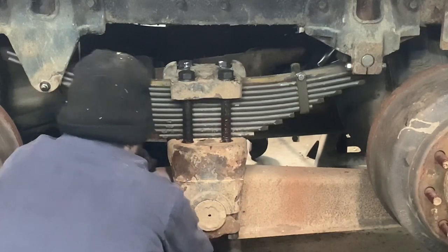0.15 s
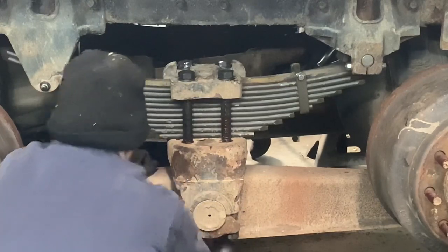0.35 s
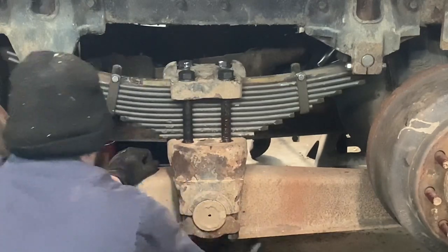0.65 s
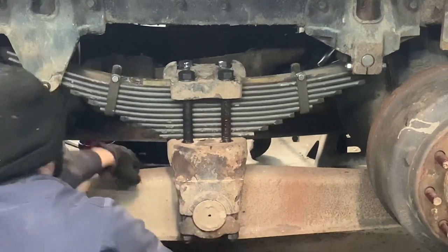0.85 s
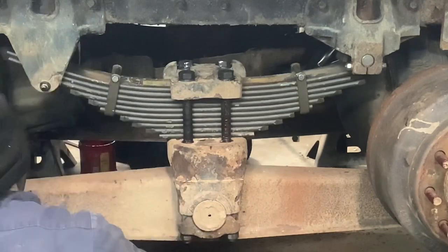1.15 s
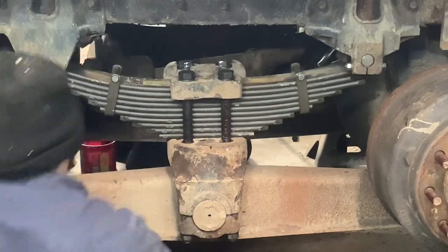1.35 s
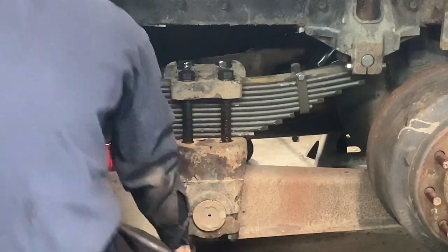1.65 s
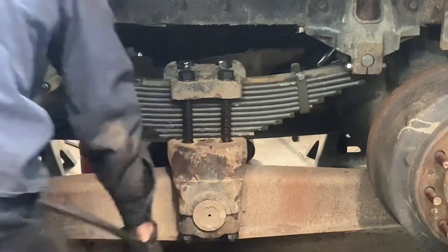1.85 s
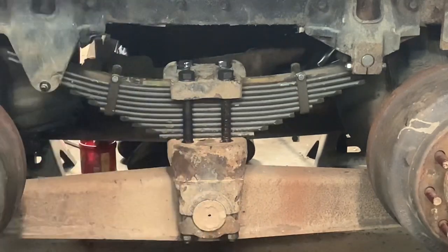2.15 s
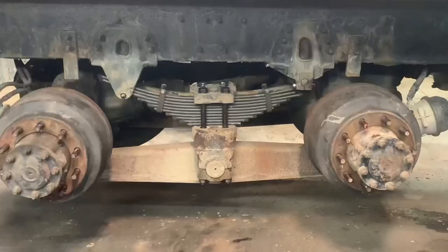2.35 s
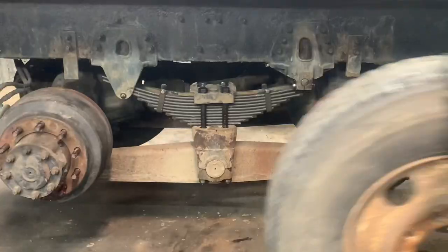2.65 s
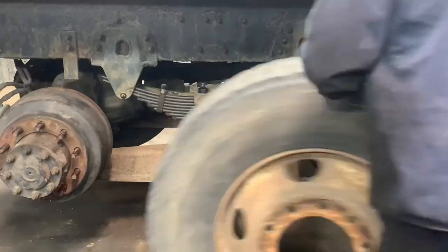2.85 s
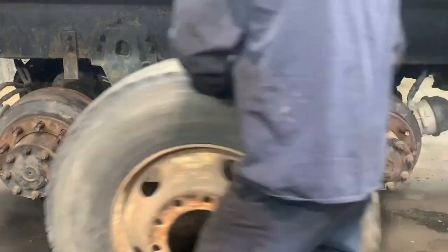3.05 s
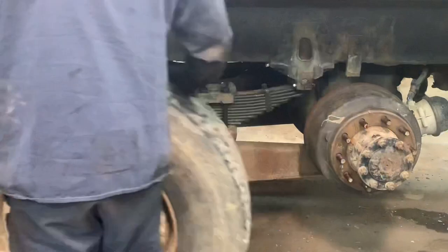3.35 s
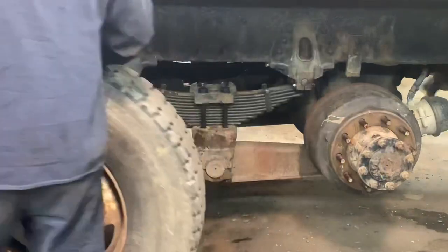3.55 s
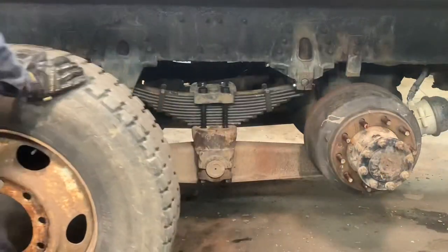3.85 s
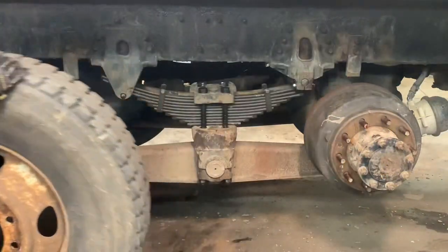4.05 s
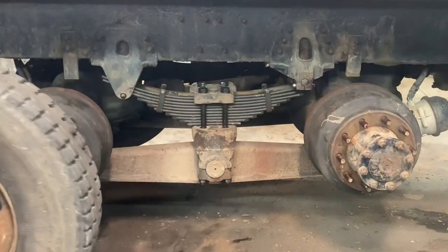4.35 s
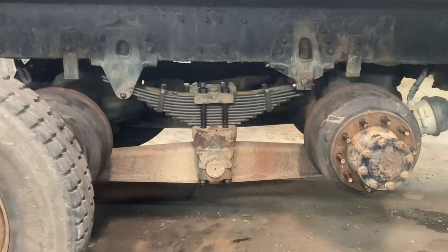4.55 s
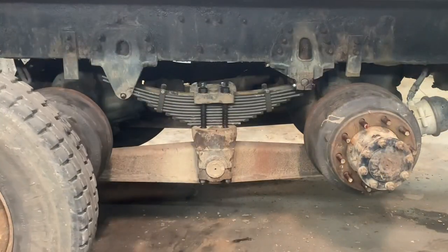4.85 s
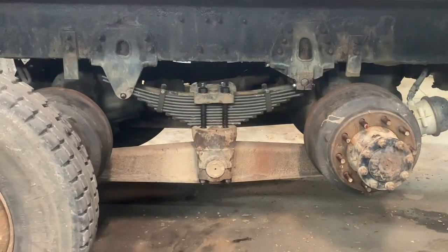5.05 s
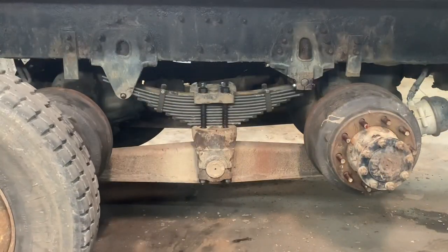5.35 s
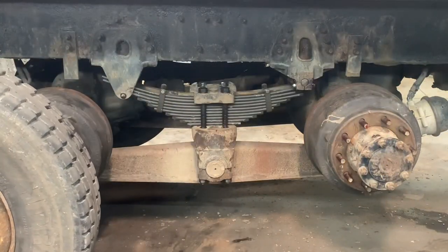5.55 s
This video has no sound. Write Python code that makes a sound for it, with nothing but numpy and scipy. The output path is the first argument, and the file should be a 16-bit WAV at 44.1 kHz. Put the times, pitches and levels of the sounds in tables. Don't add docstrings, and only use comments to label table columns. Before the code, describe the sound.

A loud compressor drone, low and rumbling with airy hiss, opens under a decaying metallic crash; a dropped part lands with a short dull thud. After a sudden scene change everything is hushed: soft rubber rubs, gritty scrapes and floor thuds from a rolling truck wheel, one bright double clink, sparse scuffs, then several hollow ringing rim knocks at the end. Indoor garage, handheld stereo pickup with softened attacks.

```python
import sys
import numpy as np
from scipy import signal
from scipy.fft import rfft, irfft
from scipy.io import wavfile
from scipy.ndimage import map_coordinates

SR = 44100
rng = np.random.default_rng(int(sys.argv[2]) if len(sys.argv) > 2 else 0)


def attenuation_scalar(level_db):
    decades = np.asarray(level_db, float) / 20
    return 10 ** decades


def wav_out(sig):
    wavfile.write(sys.argv[1], SR, np.round(np.clip(np.atleast_2d(sig).T, -1, 1) * 32767).astype(np.int16))


N = 250488
T = np.arange(N) / SR
HZ = np.maximum(np.fft.rfftfreq(N, 1 / SR), 1)
CUT_S = 2.272

# frequency in Hz, left-right likeness (1 = the same).
DRONE_LIKENESS = [(30, .99), (60, 0.95), (160, 0.9), (440, 0.6), (1200, .46), (3240, .34), (8790, 0.24)]
# frequency in Hz, radians the left port leads.
DRONE_TURN = [(0, 0), (340, -0.07), (950, 1.7), (1550, 1.5), (1810, -2.0), (2410, -0.7), (2840, -2),
              (3360, -3), (3620, -0.2), (4310, 0.0), (6460, -0.4), (7150, -0.2), (7750, 4.5), (8960, 5)]


def rms_one(x):
    return x / np.sqrt(np.mean(x ** 2) + 1e-20)


def at_hz(points):
    hz, value = np.transpose(points)
    return np.interp(np.log(HZ), np.log(hz), value)


def pan(db):
    sides = attenuation_scalar(np.array([[db / 2], [-db / 2]]))
    return rms_one(sides)


def drift(rate):
    knots = rng.standard_normal(size=600)
    coarse = T[::32]
    return np.interp(T, coarse, map_coordinates(knots, [coarse * rate], order=3, mode="wrap"))


def hump(hz, width_hz):
    return 1 / (1 + ((HZ - hz) / (width_hz / 2)) ** 2)


def swell(s, spread):
    return np.exp(-.5 * ((T - s) / spread) ** 2)


def stereo_noise(gain, likeness=None, turn=((0, 0), (1, 0))):
    # frequency in Hz, left-right likeness.
    shop_likeness = [(30, .98), (60, 0.94), (160, 0.53), (440, 0.95), (1200, 0.13), (3240, 0.27),
                     (8790, 0.32)]
    # frequency in Hz, left over right in dB.
    balance = [(30, -.5), (60, -3), (160, -2.5), (440, 2), (1200, -2.5), (3240, 2), (8790, -2.5)]
    mid, side = rfft(rng.standard_normal((2, N)))
    alike = np.clip(at_hz(shop_likeness if likeness is None else likeness), -.5, 1)
    both = np.sqrt(1 + alike) * mid + np.sqrt(1 - alike) * side * [[1], [-1]]
    lead = np.interp(HZ, *np.transpose(turn))
    ports = attenuation_scalar(np.outer([.5, -.5], at_hz(balance))) * np.exp(1j * np.outer([.5, -.5], lead))
    return rms_one(irfft(both * gain * ports, N))


def struck(modes, blows, beat, contact_gain=1.45, split_hz=18.0):
    a = max(int((blows[0][0] - .06) * SR), 0)
    b = min(int((blows[-1][0] + 0.42) * SR), N)
    out, t = np.zeros((2, N)), T[a:b]
    contact = np.array([attenuation_scalar(db) * swell(s, spread)[a:b] for s, db, spread, tilt_db in blows])
    spreads, tilts = np.array(blows)[:, 2:3], np.array(blows)[:, 3]
    force = contact / (spreads * SR * np.sqrt(2 * np.pi))
    w = 2 * np.pi * t
    for hz, db, t60 in modes:
        split, left, right, second, lean = rng.random(size=5)
        strength = attenuation_scalar(db + tilts * np.log2(hz / 2000) + 1.2 * rng.standard_normal(len(blows)))
        height = signal.lfilter([1], [1, -attenuation_scalar(-60 / (t60 * SR))], strength @ force)
        height += contact_gain * strength @ contact
        apart = (right - .5) * min(hz / 4000, .6) * np.array([[0], [1]])
        start = 2 * np.pi * (left + apart)
        pair = np.sin(w * hz + start)
        pair = pair + beat * np.sin(w * (hz + split_hz + 30 * split) + 3 * start + 6 * second)
        flutter = attenuation_scalar(3.4 * drift(30)[a:b])
        out[:, a:b] += height * flutter * pan(6 * lean - 3) * pair
    return out


def noise_swells(rows, late_s=(0, .00008), scatter=0.43):
    mid, side = rfft(rng.standard_normal((2, N)))
    heard = (mid + scatter * side * [[1], [-1]]) * np.exp(-2j * np.pi * np.outer(late_s, HZ))
    out = np.zeros((2, N))
    for s, db, hz, width_hz, spread in rows:
        out += attenuation_scalar(db) * swell(s, spread) * rms_one(irfft(heard * hump(hz, width_hz), N))
    return out


def pushes(rows, slopes):
    rise, sag, fall = slopes
    s, hold, db = np.array(rows)[:, :3, None].transpose(1, 0, 2)
    t = T[::32] - s
    return attenuation_scalar(db + rise * np.minimum(t, 0) - sag * np.clip(t, 0, hold) - fall * np.maximum(t - hold, 0))


def overlaid(gains):
    return np.interp(T, T[::32], np.sqrt(np.sum(gains ** 2, axis=0)))


def compressor():
    orders = [3, 4, 6, 10, 12, 17, 19, 20, 22, 23, 24, 26, 30, 31, 33, 37, 39, 41, 43, 44, 48, 50, 54, 64,
              69, 71, 72, 76, 83, 94]
    # level in dB, left over right in dB.
    order_levels = [(-53, -0.5), (-38.5, -2), (-47.5, -7.5), (-49, -7), (-52, -5.5), (-51, 1), (-51, -1),
                    (-46.5, -2), (-48.5, -5), (-53, -11), (-52, -1), (-41, -14), (-57, -9.5), (-49.5, -9),
                    (-61, 2), (-57.5, -10.5), (-57, 1), (-60, -4), (-57.5, -4), (-54.5, 1), (-55, 1),
                    (-56.5, -2.5), (-55.5, -6.5), (-55.5, 2.5), (-62.5, -3.5), (-55, 0.5), (-53, 2.5),
                    (-55.5, 1), (-63, 10.5), (-54, 8.5)]
    # pitch in Hz, width in Hz, level in dB, left over right in dB.
    casing_modes = [(60, 56, -43, -2), (121.2, 34, -40.5, -6.5), (240, 130, -53, -3), (332, 54, -52, 7),
                    (419, 60, -49.5, 0), (561, 98, -46, -11.5), (835, 130, -49, -0.5),
                    (936, 240, -63, -4.5), (1300, 125, -46, 4), (1532, 140, -51, 3.5),
                    (1832, 130, -49.5, 1), (2037, 150, -52, -4)]
    # frequency in Hz, level in dB per Hz.
    air_colour = [(380, -38.5), (650, -2), (703, -19.5), (759, -18), (839, -12.5), (1130, -10.5),
                  (1280, -10), (2090, -7.5), (3150, -16), (6400, -11), (9240, -34.5), (12000, -63.5),
                  (20300, -120)]
    shaft_hz = 22.32
    body_db, hiss_db = 0.32, -40
    climb_db_per_s = 0.98
    duck_db, duck_s = 1, 0.068
    duck = duck_db * T / duck_s * np.exp(1 - T / duck_s)
    load = attenuation_scalar(climb_db_per_s * T - duck) * np.clip((CUT_S - T) / 0.032, 0, 1)

    lines = np.zeros((2, N))
    for k, (db, pan_db), (start, apart) in zip(orders, order_levels, rng.random((len(orders), 2))):
        phase = 2 * np.pi * (k * shaft_hz * T + start) + .5 * drift(9) * (1 + k / 40)
        offset = (apart - .5) * min(k / 8, 6) * np.array([[.5], [-.5]])
        level = attenuation_scalar(db + 1.24 * drift(13.74)) * np.sqrt(2)
        lines += level * pan(pan_db) * np.sin(phase + offset)

    power = sum((attenuation_scalar(db) * pan(pan_db) * hump(hz, width_hz)) ** 2 / width_hz
                for hz, width_hz, db, pan_db in casing_modes)
    casing = stereo_noise(np.sqrt(power), DRONE_LIKENESS, DRONE_TURN)
    casing *= np.sqrt(sum(attenuation_scalar(row[2]) ** 2 for row in casing_modes))

    turns = 2 * np.pi * shaft_hz * T
    throb = 1 + 0.037 * np.sin(turns) + 0.03 * np.sin(3 * turns)
    hiss = throb * stereo_noise(attenuation_scalar(at_hz(air_colour)), DRONE_LIKENESS, DRONE_TURN)
    return load * (attenuation_scalar(body_db) * (lines + casing) + attenuation_scalar(hiss_db) * hiss)


def bang():
    # frequency in Hz, level in dB per Hz.
    crash_colour = [(88, -30), (150, -3.5), (355, -10), (799, -4.5), (949, -11), (1290, -5), (1710, -11),
                    (3230, -10), (6430, -16), (9240, -31.5), (12000, -64), (20300, -120)]
    # pitch in Hz, level in dB, t60 in seconds.
    ring_modes = [(746, -7, .15), (855, -7, .1), (1060, -2, .1), (1295, 4, 0.16), (1915, -5.5, 0.22),
                  (2150, -7, 0.22), (2300, -8, .1), (2415, -9.5, .3), (2730, -15, .15), (2960, -3, 0.5),
                  (3150, -4, .12), (3650, -5, 0.28), (4690, -9, .12), (5125, -14, .2)]
    t = np.minimum(T, 1)
    decay = attenuation_scalar(-26 - 60 * t / 0.16) + attenuation_scalar(-34 - 60 * t / 0.8)
    crash = decay * stereo_noise(attenuation_scalar(at_hz(crash_colour)), DRONE_LIKENESS, DRONE_TURN)
    return crash + struck(ring_modes, [(.004, -34.5, 0.0048, 0.0072)], beat=0.31)


def dropped_part(blow, beat):
    # pitch in Hz, level in dB, t60 in seconds.
    part_modes = [(222, -5, .05), (285, -0.5, 0.035), (409, -4.5, 0.046), (548, -11, 0.06),
                  (644, -12, 0.05), (830, -15.5, .03), (968, -15, .04), (1290, -12, .04)]
    return struck(part_modes, [blow], beat)


def loud_top_cut(x):
    return signal.sosfilt(signal.ellip(6, 1, 60, 9030, fs=SR, output="sos"), x)


def cracks():
    # moment in seconds, level in dB, pitch in Hz, width in Hz, spread in seconds.
    edges = [
        (0.84, -78, 10500, 4000, 0.012),
        (0, -58.5, 11000, 1500, 0.0074),
        (0, -60, 11500, 2000, .002),
    ]
    return noise_swells(edges)


def wheel_rim():
    # pitch in Hz, level in dB, t60 in seconds.
    rim_modes = [(460, -14, 0.2), (511, -12, .2), (642, -13, 0.26), (880, -7, 0.27), (958, -5, 0.35),
                 (1125, -9, 0.3), (1290, -8, 0.24), (1436, -4.5, .25), (1556, -5.5, 0.14), (1722, -3, 0.22),
                 (1860, -5, 0.15), (1960, -6, .12), (2260, -4.5, 0.19), (2400, -6.5, .15), (2650, -14, .2),
                 (2750, -9, 0.45), (2840, -12, .5), (3345, -14, 0.7), (3925, -13, .7), (4245, -18, .6),
                 (4525, -19, .7), (4665, -16, 0.7), (5097, -16, .7), (5345, -17, 0.7), (5405, -17, 0.7),
                 (5500, -17, .6), (5712, -15, 0.6), (5835, -17, .6), (6270, -15, 0.8), (6675, -16, .7),
                 (6755, -18, 0.7), (7200, -22, 0.6), (7288, -20, .6), (8820, -35, .2)]
    # moment in seconds, level in dB, spread in seconds, tilt in dB per octave.
    knocks = [
        (5.16, -72.5, 0.0091, -1),
        (5.232, -71.5, 0.031, 2),
        (5.346, -61, 0.019, -3),
        (5.43, -78, 0.018, 5),
        (5.526, -59, 0.0091, -1.5),
        (5.589, -71.5, 0.018, 3),
        (5.661, -65, 0.008, 0),
    ]
    return struck(rim_modes, knocks, beat=0.67)


def steel_tool():
    # pitch in Hz, level in dB, t60 in seconds.
    tool_modes = [(1435, -13.5, 0.07), (2000, -7, 0.1), (2285, -2, 0.086), (2370, -16, .08),
                  (2730, -4.5, 0.07), (3285, -0.5, 0.38), (3925, -2.5, 0.46), (4410, -7, 0.3),
                  (4470, -5, .2), (4670, -19, 0.9), (5095, -15, .2), (5518, -10, 0.36), (5850, -7, 0.36),
                  (6290, -8.5, 0.3), (6655, 2, 0.13), (6760, -9, 0.3), (7040, -21, .1), (7250, -15, 0.52),
                  (7660, -21, 0.15), (7920, -26, .08), (8230, -28, .07), (8850, -25, 0.12),
                  (9300, -28, .07)]
    # moment in seconds, level in dB, spread in seconds, tilt in dB per octave.
    clinks = [
        (4.043, -56, 0.0087, -2),
        (4.062, -50, 0.0051, 1.5),
    ]
    damped_s = 4.18
    hand = attenuation_scalar(-170 * np.maximum(T - damped_s, 0))
    return hand * struck(tool_modes, clinks, beat=1.0, split_hz=34.0)


def single_modes():
    # moment in seconds, pitch in Hz, level in dB, t60 in seconds.
    chinks = [(4.048, 2730, -50, .08), (4.04, 6667, -58, .1), (4.058, 6667, -51, .09),
              (4.13, 6690, -61, .12), (4.09, 5512, -56, .15), (4.185, 5865, -68, .1),
              (4.075, 1991, -57, .06), (4.07, 3916, -48, .14), (4.11, 5840, -58, .15),
              (4.13, 6291, -61, .15), (4.16, 4670, -67, .15), (4.23, 3895, -73, .1),
              (5.24, 6285, -77, 0.33), (5.265, 3935, -75, .2), (5.335, 3924, -74, .12),
              (5.36, 1718, -60, .08), (5.36, 960, -60, .08), (5.39, 5098, -74, .12), (5.41, 1857, -69, .1),
              (5.45, 5478, -76, .1), (5.46, 2714, -74, .1), (5.535, 959, -61, .25), (5.56, 4242, -74, .1),
              (5.57, 5097, -73, .1), (5.55, 5717, -72, .2), (5.57, 6281, -73, .2), (5.645, 410, -62, .08),
              (5.165, 2285, -67.5, .2), (5.165, 4530, -76, 0.55), (5.228, 1303, -67, .1),
              (5.225, 1785, -70, .12), (5.225, 5096, -78, .2), (5.255, 2750, -68, .2),
              (5.29, 4500, -79, 0.22), (5.34, 5709, -66.5, .13), (5.445, 5832, -71, .2),
              (5.5, 2845, -69, .6), (5.528, 1447, -50, .12), (5.528, 1780, -56, .1), (5.53, 2146, -59, .1),
              (5.535, 3375, -65, 0.44), (5.525, 4032, -70, .25), (5.56, 7283, -76, .4),
              (5.565, 2370, -65, .15), (5.58, 4682, -73, .3), (5.62, 5342, -65, .6),
              (5.655, 2830, -65.5, .3), (5.665, 790, -60, .1), (5.665, 1463, -64, .1)]
    out = np.zeros((2, N))
    for s, hz, db, t60 in chinks:
        out += struck([(hz, db, t60)], [(s, 3.0, 0.01, 0)], beat=.6, contact_gain=0.67)
    return out


def thuds():
    # moment in seconds, level in dB, pitch in Hz, width in Hz, spread in seconds.
    falls = [(0.841, -40, 200, 161, 0.0077), (0.84, -42, 1300, 1200, 0.007), (.842, -34, 600, 880, 0.022),
             (2.76, -54, 220, 130, 0.027), (1.45, -45, 310, 80, .02), (1.72, -45, 200, 80, 0.015),
             (1.92, -45, 200, 76, 0.036), (.849, -51, 3000, 1200, .004), (3.635, -62, 930, 300, 0.02),
             (2.72, -65, 680, 150, 0.02), (3.15, -57, 320, 350, 0.011), (4.044, -47.5, 2290, 500, 0.0062),
             (4.054, -55, 1400, 760, 0.011), (4.056, -53.5, 420, 510, 0.016),
             (4.059, -56, 5500, 1500, 0.019), (4.06, -57, 3900, 1200, .02), (4.11, -68, 4400, 4000, 0.037),
             (5.355, -57, 1660, 800, 0.021), (5.335, -59, 2270, 410, 0.013),
             (5.368, -57.5, 2250, 500, 0.011), (5.353, -59, 950, 600, 0.019),
             (5.356, -52.5, 400, 350, 0.01), (5.529, -58, 1300, 1200, 0.017),
             (5.531, -57, 2200, 1600, 0.0097), (5.665, -53.5, 540, 660, 0.024)]
    return noise_swells(falls)


def tread_rubs():
    # moment in seconds, level in dB, pitch in Hz, width in Hz, spread in seconds.
    squeaks = [(2.64, -67, 1300, 500, .03), (2.71, -63, 1150, 400, .012), (2.77, -61, 1150, 400, .015),
               (2.79, -53, 5300, 900, .022), (2.78, -66, 2110, 500, .03), (3.28, -61, 1500, 600, .012),
               (3.305, -52, 2840, 600, .016), (3.31, -57, 1660, 300, 0.021), (3.3, -65, 4700, 700, .012),
               (3.355, -51.5, 2000, 800, .016), (3.36, -64, 6000, 700, 0.014), (3.45, -67, 1700, 500, .02),
               (3.68, -61, 1050, 400, 0.019), (3.675, -59.5, 2400, 700, .03), (3.86, -66, 1000, 400, 0.036),
               (3.89, -62, 1910, 599, 0.024), (3.93, -61, 1000, 500, 0.019), (3.96, -64, 2050, 500, .02),
               (3.96, -69, 5000, 600, .02), (4.34, -66.5, 4640, 800, 0.027), (4.48, -69, 4200, 700, .015),
               (4.62, -59, 2198, 500, .015), (4.66, -57, 2270, 700, .025), (4.91, -71, 6500, 900, 0.037),
               (5.06, -76, 2150, 200, 0.014)]
    return noise_swells(squeaks, late_s=(0.00003, 0))


def rolling_wheel():
    # start in seconds, hold in seconds, scuff level in dB,
    # tread growl in dB over the scuff, grit in dB over the scuff.
    drag_rows = [(2.323, 0.27, -64, -1.5, 4), (2.63, 0.063, -65, 4, 0.5), (2.71, 0.1, -58.5, 1.5, 4),
                 (2.812, 0.19, -64.5, -2.5, 2.5), (3.064, .11, -65, -3, -1.5),
                 (3.289, 0.074, -51.5, -7.5, -3), (3.43, 0.066, -64, -6, -2.5),
                 (3.547, .02, -68.5, -5, 0.5), (3.61, .03, -68.5, 1, 3.5), (3.667, 0.028, -59.5, 0.5, -1),
                 (3.824, 0.16, -65, 0, -1.5), (4.02, 0.13, -65, -7, 6.5), (4.228, 0.035, -70, -0.5, 8),
                 (4.332, 0.027, -64, -5, -0.5), (4.483, 0.015, -67, -15, 3.5),
                 (4.616, 0.067, -57, -6.5, -1), (4.827, 0.1, -69.5, -4, 4.5), (4.964, 0.016, -74.5, 3.5, 0),
                 (5.017, 0.12, -80, -15, 4), (5.18, 0.24, -68, -1, -8), (5.42, .02, -66, -7, 0.5),
                 (5.484, 0.22, -62, 0, -4), (5.59, .02, -66, -7, 1)]
    # start in seconds, hold in seconds, level in dB.
    rocks = [(2.33, 0.15, -67.5), (2.53, 0.034, -60), (2.74, 0.034, -60.5), (2.82, 0.19, -65.5),
             (3.147, 0.0042, -52.5), (3.3, 0.073, -60), (3.42, 0.086, -70), (3.6, 0.02, -60.5),
             (3.68, 0.064, -63.5), (3.92, 0.11, -66), (4.24, 0.22, -60), (4.48, 0.016, -59.5),
             (4.62, 0.055, -59), (4.8, 0.055, -75), (4.975, 0.0095, -67), (5.17, .27, -65), (5.5, .02, -57),
             (5.58, 0.028, -64), (5.66, .03, -59)]
    # frequency in Hz, level in dB per Hz.
    rumble_colour = [(53, -53), (90, -7), (113, -5.5), (243, -2.5), (343, -10.5), (491, -8), (786, -17),
                     (900, -26), (1170, -28), (1980, -120)]
    growl_colour = [(500, -27), (700, -10), (950, -5.5), (1250, -0.5), (1500, -6.5), (2000, -28),
                    (4000, -83)]
    scuff_colour = [(900, -27), (1300, -7), (1550, -1.5), (2250, -1), (3000, -7), (3400, -22), (5000, -44),
                    (9000, -86)]
    grit_colour = [(2000, -26), (2900, -6), (3600, -2), (4200, -4), (5000, -4), (6200, -3), (7200, -7),
                   (8000, -17), (9300, -24.5), (12000, -64)]
    # frequency in Hz, radians the left port leads.
    wheel_turn = [(0, 0), (600, -0.1), (1700, -1.4), (2200, 0), (3000, -1), (3500, -2.5), (4000, -5.5),
                  (5000, -5.8), (6000, -8.5), (7000, -4.5), (9000, -7.5)]
    slopes = (350, 8.9, 230)   # rise, sag, fall in dB per s
    drags = pushes(drag_rows, slopes)
    growl, grit = attenuation_scalar(np.array(drag_rows).T[3:, :, None])
    layers = [(pushes(rocks, slopes), rumble_colour, 2.0),
              (drags * growl, growl_colour, 2.0),
              (drags, scuff_colour, 1.4),
              (drags * grit, grit_colour, 0.67)]
    out = np.zeros((2, N))
    for gains, colour, grain_db in layers:
        grains = attenuation_scalar(grain_db * drift(90))
        out += overlaid(gains) * grains * stereo_noise(attenuation_scalar(at_hz(colour)), turn=wheel_turn)
    return out


def far_hum():
    # start in seconds, hold in seconds, level in dB, pitch in Hz.
    swells = [(2.345, .02, -46.5, 60.0), (2.51, 0.095, -52, 59), (2.76, 0.1, -50.5, 60.6),
              (2.928, 0.21, -52.5, 55.6), (3.335, .02, -53.5, 59.5), (3.448, .22, -48, 60.0),
              (3.844, 0.0097, -45.5, 60.0), (3.982, 0.26, -46.5, 60.0), (4.3, 0.21, -52, 56.4),
              (4.582, .14, -52, 57.86), (4.797, 0.22, -54.5, 60.74), (5.066, 0.35, -52, 59.05),
              (5.43, 0.1, -51, 57.9), (5.625, .06, -51, 57.8)]
    s, hold, _, pitch_hz = np.transpose(swells)
    hum_hz = np.interp(T, s + hold / 2, pitch_hz)
    level = overlaid(pushes(swells, (310, 15, 350))) * attenuation_scalar(4)
    tone = np.sin(2 * np.pi * np.cumsum(hum_hz) / SR + 0.27 * drift(22))
    return level * pan(-2.5) * tone + attenuation_scalar(-55.5) * stereo_noise(hump(52, 59))


def room_floor():
    # frequency in Hz, level in dB per Hz.
    floor_colour = [(41, -37), (70, -2.5), (114, -2), (293, -20), (551, -23.5), (882, -37), (1060, -37),
                    (1530, -42), (4520, -52), (4900, -46), (7850, -63), (9240, -66.5), (12000, -94),
                    (20300, -120)]
    airy = attenuation_scalar(-92) * stereo_noise(hump(10900, 4100), DRONE_LIKENESS)
    return attenuation_scalar(-58) * stereo_noise(attenuation_scalar(at_hz(floor_colour))) + airy


def shop():
    return np.clip((T - CUT_S) / 0.029, 0, 1) * (rolling_wheel() + far_hum() + room_floor())


def dipping_top(x):
    # moment in seconds, spread in seconds, share lost (1 = all).
    dips = [
        (4.143, .06, 1),
        (5.26, 0.092, 0.42),
        (5.57, 0.05, 0.45),
    ]
    kept = np.ones(N)
    for s, spread, lost in dips:
        flat_dip = swell(s, spread) ** ((T - s) / spread) ** 2
        kept *= 1 - min(lost, 1) * flat_dip
    top = irfft(rfft(x) * (HZ > 7850), N)
    return x - (1 - kept) * top


def scene():
    landing = dropped_part((.84, -27.5, 0.0043, 0.0042), beat=0.39)
    second_landing = dropped_part((3.149, -59.0, 0.0064, 1.7), beat=.35)
    loud = loud_top_cut(compressor() + bang() + landing) + cracks()
    steel = wheel_rim() + steel_tool() + single_modes() + second_landing
    return loud + steel + dipping_top(thuds() + tread_rubs() + shop())


def low_pass(x):
    return signal.sosfilt(signal.butter(12, 12700, fs=SR, output="sos"), x)


def record(dry):
    ports = signal.sosfilt(signal.butter(4, 27.0, "high", fs=SR, output="sos"), dry)
    return low_pass(ports)


dry = scene()
out = record(dry)
wav_out(out)
```